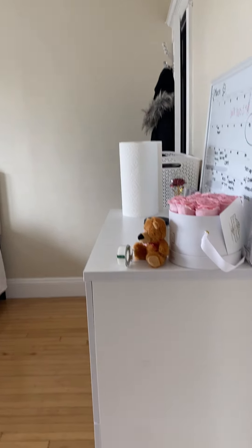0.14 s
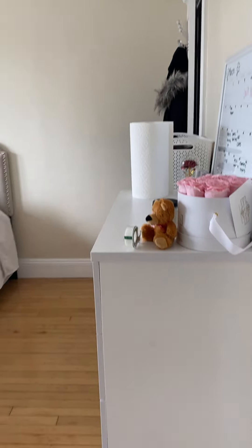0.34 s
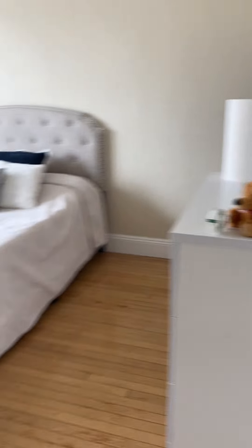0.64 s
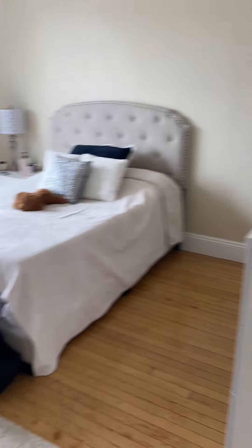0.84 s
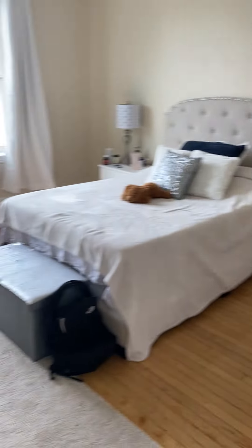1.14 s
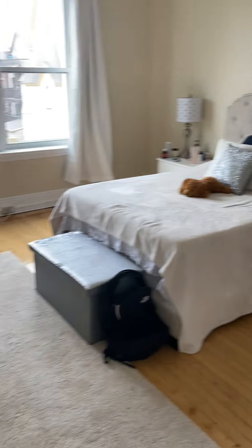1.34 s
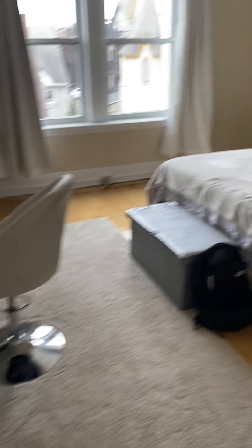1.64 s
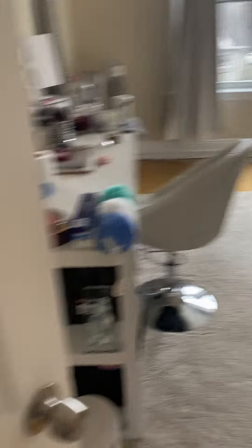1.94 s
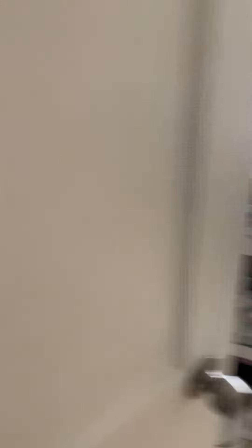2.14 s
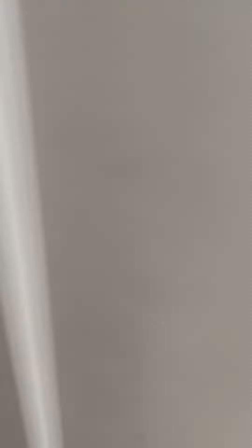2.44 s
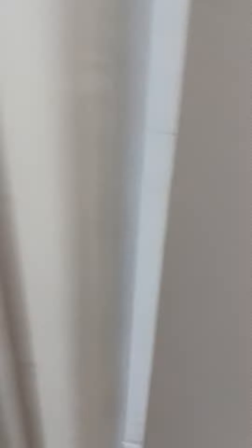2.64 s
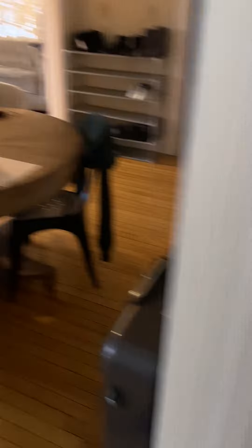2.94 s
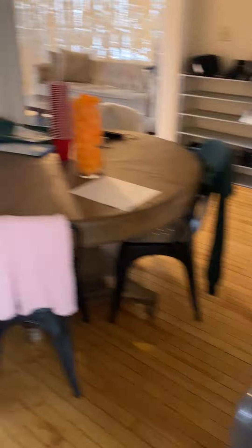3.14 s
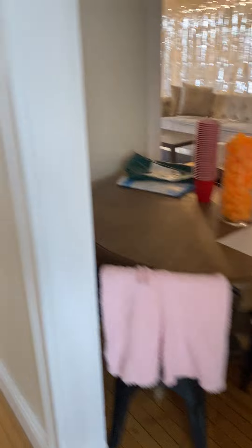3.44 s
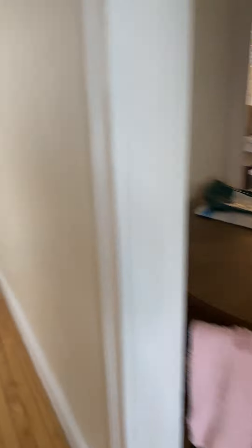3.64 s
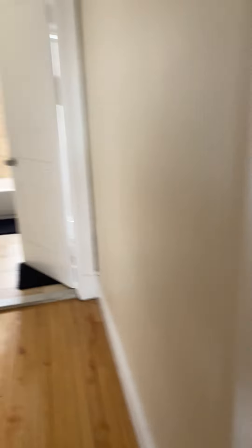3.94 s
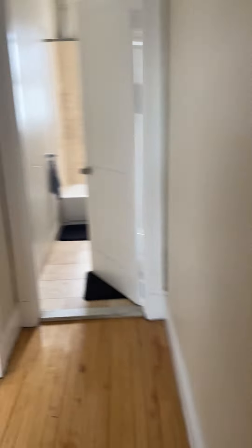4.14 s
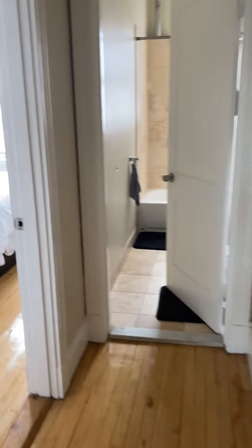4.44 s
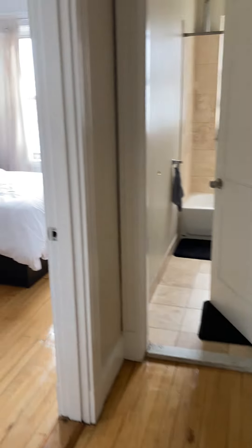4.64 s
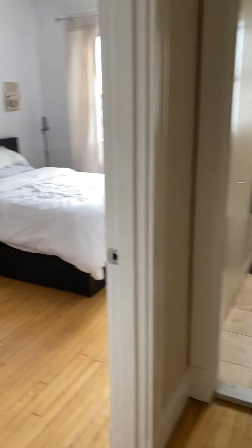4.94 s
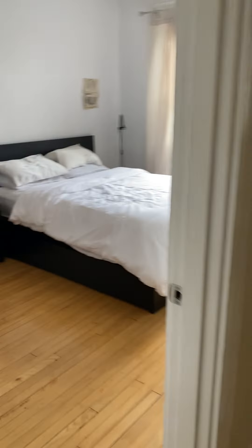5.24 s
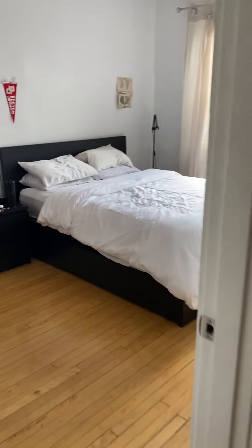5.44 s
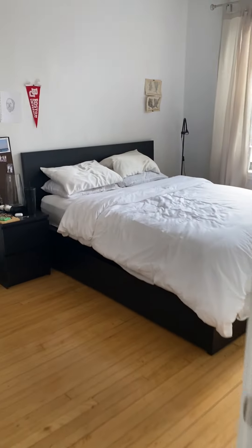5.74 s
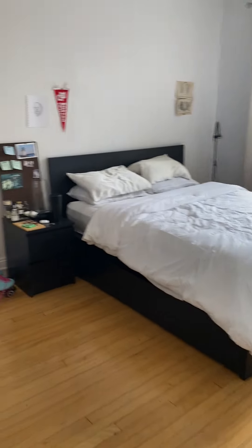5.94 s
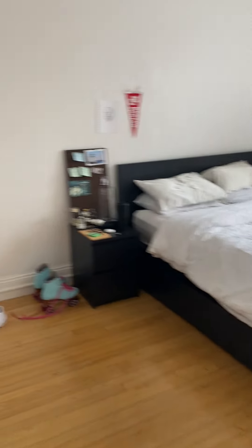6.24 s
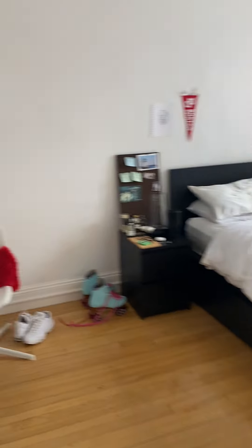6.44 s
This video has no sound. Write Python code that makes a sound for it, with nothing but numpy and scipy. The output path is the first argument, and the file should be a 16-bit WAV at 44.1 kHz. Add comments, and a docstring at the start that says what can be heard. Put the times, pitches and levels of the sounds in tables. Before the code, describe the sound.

Soft footsteps on old hardwood indoors, recorded by a phone carried in the hand. First come crisp, stuttering creaks and knocks of floorboards with a short lively room echo. Around the middle it nearly falls silent, then deep cushioned thumps make the floor sway, accompanied by rubbing soles, faint clothing rustle and small clicks. One last woody crack and a drag close it, over steady low room tone.

```python
"""Footsteps on old hardwood floors

Someone walks through a flat, holding a phone. Boards crack in quick stick-slip runs: short noise rasps, modes
and a decaying room. Softer footfalls are noise thumps with ringing modes and a swaying low sine for the joists.
Grainy noise strokes make scuffing soles, short gritty bursts and sounds like brushed cloth, over coloured noise
for the hum of the rooms."""
import sys
import numpy as np
from scipy import signal
from scipy.fft import rfft, irfft
from scipy.io import wavfile
from scipy.ndimage import uniform_filter1d

SR = 44100
rng = np.random.default_rng(int(sys.argv[2]) if len(sys.argv) > 2 else 0)


def digitize_waveform(pressure):
    """Quantize a signal to 16-bit integers and store it at the path in sys.argv[1].

    Rows of a 2-D input are taken as channels; values are limited to [-1, 1].
    """
    field = np.atleast_2d(pressure).T
    bounded = np.clip(field, -1, 1)
    quanta = np.round(bounded * 32767).astype(np.int16)
    wavfile.write(sys.argv[1], SR, quanta)


N = 291456  # samples


def amp(db):
    """Decibel law: 20 dB is a factor of ten in amplitude."""
    return 10 ** (np.asarray(db) / 20)


def evened(x):
    """Normalisation of power: scales to rms 1."""
    return x / np.sqrt(np.mean(x ** 2) + 1e-20)


def read(points, hz):
    """Logarithmic pitch: interpolates a table on a log-frequency axis."""
    f, value = np.transpose(points)
    return np.interp(np.log(hz + 1), np.log(f + 1), value)


def add(mix, s, sound):
    """Superposition: adds a sound into the mix at time s."""
    part = mix[:, round(s * SR):][:, :sound.shape[-1]]
    part += sound[..., :part.shape[1]]


# Likeness of diffuse sound at the phone's two ports.
# Each row: frequency in Hz, correlation from 0 to 1.
PORT_LIKENESS = [(100, 0.97), (300, 0.87), (600, 0.32), (1300, 0.65), (4000, 0.98), (15000, 1)]


def noise(spectrum, size):
    """Spatial coherence: coloured noise, partly shared by two ports; 0 dB is white noise of rms 1."""
    hz = np.fft.rfftfreq(size, 1 / SR)
    a, b = rfft(rng.standard_normal((2, size)))
    same = np.clip(read(PORT_LIKENESS, hz), 0, 1)
    common = a * np.sqrt((1 + same) / 2)
    apart = b * np.sqrt((1 - same) / 2)
    ports = np.array([common + apart, common - apart])
    return irfft(ports * amp(read(spectrum, hz)), size)


def colour(x, gain_db):
    """Minimum-phase filtering: causal; the gain is given round the full circle of frequencies."""
    response = np.exp(np.conj(signal.hilbert(np.log(amp(gain_db)))))
    taps = np.fft.ifft(response).real
    return signal.fftconvolve(x, taps[None, :len(taps) // 2], axes=1)[:, :x.shape[1]]


# Reverberation of the rooms. Each row: frequency in Hz, time to fall by 60 dB in seconds.
ROOM = [(60, 0.66), (150, 0.48), (260, 0.36), (700, 0.42), (1800, 0.41), (5000, 0.35), (15000, 0.46)]


def room_tail(spectrum, length, size=256):
    """Reverberant decay: diffuse noise of rms 1 before each band dies exponentially."""
    hz, t, bands = signal.stft(evened(noise(spectrum, length)), SR, nperseg=size)
    decay = amp(-60 * t / read(ROOM, hz)[:, None])
    return signal.istft(bands * decay, SR, nperseg=size)[1][:, :length]


def swell(t, rise, order):
    """Transient envelope: climbs from zero to 1 at t = rise, then dies; a higher order is narrower."""
    u = np.maximum(t, 0) / rise
    return (u * np.exp(1 - u)) ** order


# Spectrum of the hum. Each row: frequency in Hz, density in dB per Hz before the room gain.
AMBIENCE = [(20, -108), (42, -79), (56, -80), (80, -83), (120, -80), (150, -88.5), (230, -90.5), (330, -98),
            (500, -110), (1000, -117), (2000, -122), (5000, -128), (11000, -132), (16000, -139)]
# Gain of the hum from room to room. Each row: time in seconds, gain in dB.
HUM_LEVEL = [(0, 1), (0.552, -3), (1.3, 0), (2.6, 0.5), (3.8, 2), (4.4, 1.5), (5.5, 1), (6.6, 5)]


def hum():
    """Stationary background: low coloured noise whose level drifts along the walk."""
    gain_db = np.interp(np.arange(N) / SR, *np.transpose(HUM_LEVEL))
    return noise(AMBIENCE, N) * np.sqrt(SR / 2) * amp(gain_db)  # density per Hz over the whole band


def friction(strokes, spectrum, grain_db, grain_s):
    """Dry friction: strokes of noise, grainy like surfaces that catch and let go."""
    t = np.arange(N) / SR
    power = sum(amp(db) ** 2 / np.cosh(np.clip((t - s) / half, -20, 20)) ** 2 for s, db, half in strokes)
    window = max(2, int(grain_s * SR))
    grain = evened(uniform_filter1d(rng.standard_normal(N), window))
    return np.sqrt(power) * evened(noise(spectrum, N) * amp(grain_db * grain))


# Spectrum of the hollow tone. Each row: frequency in Hz, relative density in dB per Hz.
DRONE = [(250, -28), (380, -7), (440, -10), (505, 2.5), (580, -17), (900, -17), (3000, -51)]


def drone():
    """Narrow-band noise: a faint hollow tone near 500 Hz swells and fades once."""
    return friction([(3.12, -65.5, 0.11)], DRONE, grain_db=2, grain_s=.035)


# Bright strokes of noise, like brushed cloth, near and between footfalls.
# Each row: time of the height in seconds, level of the brush in dB, half length in seconds.
BRIGHT_STROKES = [(0.333, -67, 0.013), (1.076, -66, 0.021), (1.65, -61, 0.03), (2.653, -83, 0.088),
                  (3.763, -80, 0.12), (4.95, -63, 0.02), (5.05, -73, 0.06), (5.36, -78, 0.09)]
BRUSH_LAG_S, BRUSH_HALF_S = 0.058, 0.052  # the clothes follow each footfall
BRUSH_SHEEN_DB, BRIGHT_SHEEN_DB = -7, 2  # silky treble re the brush


def brushes():
    """Delayed motion: clothes brush after each footfall; bright strokes join them. Adds sheen in dB."""
    after_steps = [(s + BRUSH_LAG_S, db, BRUSH_HALF_S, BRUSH_SHEEN_DB) for s, *_, db in STEPS]
    return after_steps + [(*row, BRIGHT_SHEEN_DB) for row in BRIGHT_STROKES]


# Spectra like rubbed cloth and its silky sheen. Each row: frequency in Hz, relative density in dB per Hz.
CLOTH = [(100, 6), (800, 12.5), (2500, 9.5), (5500, 0.5), (8000, -2), (11000, -12), (16000, -19)]
SHEEN = [(500, -26), (3000, -25), (6000, -2), (9000, -3.5), (12000, -3), (16000, -7)]


def clothes():
    """Textile friction: a broad brush and a finer-grained treble share their strokes."""
    brush_strokes = [row[:3] for row in brushes()]
    sheen_strokes = [(s, db + sheen_db, half) for s, db, half, sheen_db in brushes()]
    brush = friction(brush_strokes, CLOTH, grain_db=1.5, grain_s=0.0086)
    sheen = friction(sheen_strokes, SHEEN, grain_db=2, grain_s=0.0034)
    return brush + sheen


# A foot dragging or turning on the boards.
# Each row: time of the height in seconds, level in dB, half length in seconds.
DRAGS = [(2.17, -58, 0.023), (2.55, -75, 0.026), (3.58, -63, 0.04), (3.87, -64, 0.021), (5.31, -62, 0.06),
         (5.53, -70, 0.017), (6.37, -53.5, 0.034)]
# Spectrum of a sliding sole. Each row: frequency in Hz, relative density in dB per Hz.
SOLE = [(60, 3), (350, 17), (800, 3.5), (1400, -2), (2400, -3), (3500, -15.5), (6000, -15.5), (16000, -98)]
SCUFF_LAG_S, SCUFF_HALF_S = 0.047, 0.04  # the sole slides just after it lands


def soles():
    """Sliding friction: the sole scuffs after each footfall and drags in between."""
    scuffs = [(s + SCUFF_LAG_S, db, SCUFF_HALF_S) for s, _, _, db, _ in STEPS]
    return friction(scuffs + DRAGS, SOLE, grain_db=1.5, grain_s=.006)


# Short gritty bursts: some sharpen a crack, others are creaks of their own.
# Each row: time of the height in seconds, level in dB, half length in seconds.
GRITTY_BURSTS = [(.149, -52, .003), (.222, -54, 0.005), (2.146, -45.5, 0.0037), (2.185, -51.5, 0.023),
                 (4.10, -56.5, 0.025), (4.6, -57.5, 0.019), (5.195, -62, 0.0086), (5.667, -61, 0.02),
                 (6.344, -45, 0.0089)]
# Spectrum of the bursts. Each row: frequency in Hz, relative density in dB per Hz.
GRIT = [(200, -29), (700, -3), (1200, 12.5), (1750, 9), (2100, 6), (2550, 4), (3600, -4.5), (8000, -76.5)]


def gritty_bursts():
    """Irregular friction: strongly grained noise sharpens some cracks and makes creaks of its own."""
    return friction(GRITTY_BURSTS, GRIT, grain_db=5.5, grain_s=0.0019)


# Modes of the boards. Each row: frequency in Hz, relative level in dB, time to fall by 60 dB in seconds.
BOARD = [(123.8, -10.5, 0.26), (150, -14.5, 0.16), (205.5, -5.5, 0.21), (263.9, -4, 0.25),
         (330.3, -13.5, 0.21), (381.6, -8.5, 0.26), (447, -21, 0.21), (497, -2, 0.076), (718, -18, 0.056),
         (756, -8, 0.037), (886, -3.5, 0.057), (992, -5.5, 0.049), (1330, -9, 0.033), (1565, -9, 0.043),
         (1720, -24, 0.03), (2134, -13.5, 0.12), (2290, -23.5, .12), (2850, -25, .08)]


def ringing(t, hardness_hz, rise, detune=0.0086):
    """Modal superposition: decaying sines; a soft blow weakens the modes above hardness_hz."""
    hz, db, t60 = np.transpose(BOARD)[:, :, None]
    off, turn = rng.standard_normal((len(BOARD), 2)).T[:, :, None]  # random detuning and phase
    strength = amp(db) / (1 + (hz / hardness_hz) ** 2)
    decay = np.exp(-np.log(1000) * t / t60)
    modes = strength * decay * np.sin(2 * np.pi * (hz * (1 + detune * off) * t + turn))
    return modes.sum(0) * (1 - np.exp(-(t / rise) ** 2))


# Footfalls. Each row: start in seconds, sway of the joists in dB, relative thump in dB,
# scuff of the sole in dB, brush of clothing in dB.
STEPS = [(0.271, -63, -47.5, -80, -74), (0.655, -53, -37, -75, -85), (0.878, -45, -43, -75, -80),
         (1.41, -71, -47.5, -75, -70), (1.60, -52, -55, -75, -85), (1.968, -56, -46.5, -75, -85),
         (2.26, -50.5, -54, -75, -76), (2.67, -57, -67, -85, -85), (3.119, -61, -55, -80, -90),
         (3.309, -40.5, -44.5, -78, -85), (3.442, -31.5, -36.5, -50.5, -71), (3.986, -42, -44.5, -62, -68),
         (4.11, -48, -54, -59, -70), (4.556, -30, -44.5, -54.5, -63), (4.705, -38, -54, -65, -64.5),
         (5.085, -41, -57, -67, -73), (5.179, -47, -47, -58, -66), (5.618, -47, -42.5, -60, -80),
         (5.76, -48, -46, -62, -66), (6.058, -77, -49, -74, -82), (6.41, -56, -51.5, -66, -66)]
# Spectrum of the thump. Each row: frequency in Hz, relative density in dB per Hz.
THUMP = [(25, -1.5), (60, -1.5), (85, -4.5), (130, 4.5), (170, -2.5), (260, -7.5), (400, -17), (800, -28),
         (3000, -54)]
# Pitch of the swaying floor along the walk. Each row: time in seconds, frequency in Hz.
JOIST_HZ = [(0, 62), (3.1, 62), (3.45, 42.5), (3.99, 40), (4.11, 68), (4.55, 46), (6.6, 48)]
LOAD_CYCLES = 2.6  # swings of the floor until it carries the full weight


def footfalls(thump_rise=.025, thump_room_db=-7, ring_db=5):
    """Impact and forced sway: a dull thump rings the boards as the weight sets the joists swaying."""
    out, t = np.zeros((2, N)), np.arange(SR * 2 // 3) / SR
    for s, sway_db, thump_db, *_ in STEPS:
        hz = np.interp(s, *np.transpose(JOIST_HZ))
        load = swell(t, LOAD_CYCLES / hz, order=3)
        sway = amp(sway_db) * load * np.sin(2 * np.pi * hz * t)
        thump = evened(noise(THUMP, len(t))) * swell(t, thump_rise, order=1)
        boom = amp(thump_room_db) * room_tail(THUMP, len(t)) * (1 - np.exp(-t / thump_rise))
        ring = amp(ring_db) * ringing(t, hardness_hz=406, rise=0.024)
        add(out, s, sway + amp(thump_db - 2.5) * (thump + boom + ring))
    return out


# Spectra of a slip's rasp and of the room's answer.
# Each row: frequency in Hz, relative density in dB per Hz.
SLIP = [(60, -21), (250, -1.5), (550, 6.5), (1000, -7.5), (1700, -12), (2300, -8), (3100, -10.5),
        (5500, -10.5), (8000, -23), (11000, -19), (16000, -30.5)]
ECHO = [(40, -7), (110, 3), (210, 8.5), (330, 2.5), (550, -2.5), (1000, -10.5), (1700, -15), (2300, -15.5),
        (3200, -12.5), (5500, -16.5), (8000, -25.5), (11000, -31), (16000, -39)]


def slip(t, slip_db=-5, ring_db=-7, room_db=-10.5, rasp_s=0.0021, bounce_s=0.0029, bounce_db=-2,
         lag_s=0.000823, room_rise=0.0049, catch_db=4, size=2048):
    """Stick-slip and dispersion: a rasp and its bounce off the floor, then the ring and the room's answer."""
    u = np.maximum([t[:size], t[:size] - bounce_s], 0) / rasp_s
    first, second = u ** 2 * np.exp(1 - u ** 2)
    envelope = np.hypot(first, amp(bounce_db) * second)
    rasp = 1.85 * np.tanh(evened(noise(SLIP, size))) * envelope
    # the wood catches and lets go within the slip
    catches = evened(uniform_filter1d(rng.standard_normal(size), SR // 2000))
    rasp *= evened(amp(catch_db * np.tanh(catches)))
    # bending waves: treble arrives first, 1 kHz after lag_s
    khz = np.fft.rfftfreq(size, 1 / SR) / 1000
    slow_bass = np.exp(-4000j * np.pi * lag_s * np.sqrt(khz))
    direct = amp(ring_db) * np.tile(ringing(t, hardness_hz=5900, rise=0.0031), (2, 1))
    add(direct, 0, amp(slip_db) * irfft(rfft(rasp) * slow_bass))
    echo = amp(room_db) * room_tail(ECHO, len(t)) * (1 - np.exp(-(t / room_rise) ** 2))
    return direct, echo


# Loaded floorboards, each cracking once or in a stick-slip run.
# Each row: times of its slips in seconds, relative level in dB, body in dB re level, pitch in Hz.
CRACKS = [((0.146,), -38.5, -22, 2100), ((0.218, 0.262), -42, -1, 2140), ((0.664, 0.68, 0.701, 0.728),
          -23.6, -4.5, 1330), ((0.879, 0.912, 0.947), -21.5, -3, 1290), ((1.407,), -35, -3, 1940),
          ((1.463,), -44.5, 6, 1940), ((1.561, 1.584), -32, -6, 2320), ((1.598, 1.63, 1.654, 1.686),
          -23.3, -5, 2300), ((1.965,), -23.2, -0.5, 1130), ((2.037,), -34, -3, 1500), ((2.138,),
          -30, -8.5, 1650), ((2.194,), -35.5, -1, 1120), ((2.222,), -35.5, -2, 2550), ((2.266,),
          -25.7, 0.5, 1100), ((3.445,), -33.3, -4.5, 1160), ((6.316,), -31.5, 0.5, 1400)]
# Dull knocks of a board under a sole.
# Each row: time in seconds, relative level in dB, body in dB re level, treble setting in dB.
KNOCKS = [(0.196, -32.5, -12, -26), (0.274, -33.5, 2.5, -33), (0.335, -34.5, -6, -25),
          (0.617, -43.5, 6, -26), (3.001, -38, -13, -56), (3.118, -51.5, 3, -19), (4.141, -47, -9, -30),
          (4.712, -51, 5, -23), (5.038, -50, 1, -36), (5.184, -45, -1.5, -22), (5.645, -39.5, -13.5, -40),
          (5.772, -48, -14, -20), (6.064, -66, 5, -35), (6.271, -57, 10, -49)]
# Thin, bright ticks. Each row: time in seconds, relative level in dB, pitch in Hz.
TICKS = [(0.585, -52, 2060), (2.644, -49, 2660), (3.309, -49, 1330), (3.982, -51, 1600),
         (4.582, -37.5, 2500), (4.924, -55, 1740), (5.135, -47.5, 1210), (6.34, -46.5, 1670)]
# How much of the room reaches the phone; close walls and door frames shut it out.
# Each row: time in seconds, gain in dB.
OPENNESS = [(0, 0.5), (1.5, 1), (2.3, -0.5), (2.6, -6), (3.15, -7), (3.45, 5), (4.8, 0), (5.1, -5),
            (5.25, 2), (6.6, 1)]
# the fainter a slip, the more of it is room: reference level, dB of room per dB below it, offset for ticks
NEAR_DB, ROOM_DB_PER_DB, TICK_ROOM_DB = -27.5, 0.36, -3
CRACK_SNAP_DB, SNAP_DB_PER_DB = -18, 0.45  # treble setting; the harder a board cracks, the brighter it is
KNOCK_HZ = 1200
TICK_BODY_DB, TICK_SNAP_DB = -17, -5


def slips():
    """Direct-to-reverberant ratio: every slip in time order, as (s, level, body, snap, pitch Hz, room dB)."""
    rows = []
    for times, db, body_db, hz in CRACKS:
        snap_db = CRACK_SNAP_DB + SNAP_DB_PER_DB * (db - NEAR_DB)
        rows += [(s, db, body_db, snap_db, hz, 0) for s in times]
    rows += [(*row, KNOCK_HZ, 0) for row in KNOCKS]
    rows += [(s, db, TICK_BODY_DB, TICK_SNAP_DB, hz, TICK_ROOM_DB) for s, db, hz in TICKS]
    placed = []
    for s, db, *tone, wet_db in sorted(rows):
        open_db = np.interp(s, *np.transpose(OPENNESS))
        placed.append((s, db, *tone, wet_db + open_db + ROOM_DB_PER_DB * (NEAR_DB - db)))
    return placed


def cracks(alike=0.6, usual_snap_db=-9, pitch_db=5, pitch_width=0.18, gain_db=-1, lead_s=.0008):
    """Common source: close slips share a board's sound, each with a body, snap and pitch set by its row or kind."""
    out, t = np.zeros((2, N)), np.arange(SR * 4 // 7) / SR
    hz = abs(np.fft.fftfreq(2048, 1 / SR))
    last = -np.inf
    for s, db, body_db, snap_db, pitch_hz, wet_db in slips():
        if s - last > .2:  # after a pause the foot stands on another board
            board = np.array(slip(t))
        last = s
        direct, echo = np.sqrt(alike) * board + np.sqrt(1 - alike) * np.array(slip(t))
        tone = read([(280, body_db), (650, 0), (1900, 0), (4500, snap_db - usual_snap_db)], hz)
        # the joint's own resonance
        tone += pitch_db * np.exp(-(np.log((hz + 1) / pitch_hz) / pitch_width) ** 2)
        crack = colour(direct + amp(wet_db) * echo, tone)
        add(out, s - lead_s, amp(db + gain_db) * crack)
    return out


def scene():
    """Linear superposition: boards, feet and clothes over the hum of the rooms."""
    return hum() + drone() + clothes() + soles() + gritty_bursts() + footfalls() + cracks()


# Level balance of the phone's two ports. Each row: frequency in Hz, left minus right in dB.
PORT_BALANCE = [(60, -1.5), (92, -1.5), (140, -2.5), (210, -4.0), (330, -6.0), (500, -7.5), (770, -4.0),
                (1170, -1.5), (1790, -0.5), (2740, -0.5), (4190, -0.5), (6410, 0.5), (9810, 0.0),
                (15000, 0.0)]
# Phase between the ports. Each row: frequency in Hz, lead of the left in radians.
PORT_PHASE = [(0, 0), (340, 0.0), (600, 1.2), (950, 0.2), (1810, 0.1), (3010, 1.3), (4310, 1.0),
              (5250, 0.4), (6890, 3.0), (8180, 3.6), (9730, 6.1), (10900, 6.3), (12500, 8.8), (14400, 9.8),
              (15800, 12.3), (16100, 12.0)]
EDGE_HZ = 16000  # upper band limit


def record(dry, low_cut_hz=30):
    """Interchannel difference: two ports differ in level and phase, lose the deepest bass and are band-limited."""
    hz = np.fft.rfftfreq(N, 1 / SR)
    tilt = read(PORT_BALANCE, hz)
    lead = np.interp(hz, *np.transpose(PORT_PHASE))
    ports = amp(np.array([tilt, -tilt]) / 2) * np.exp(1j * np.array([lead, -lead]) / 2)
    low_cut = hz ** 6 / (hz ** 6 + low_cut_hz ** 6)
    heard = irfft(rfft(dry) * ports * low_cut, N)
    band_limit = signal.firwin(511, EDGE_HZ, window=("kaiser", 9), fs=SR)
    return signal.oaconvolve(heard, band_limit[None], "same")


dry = scene()
out = record(dry)
digitize_waveform(out)
```